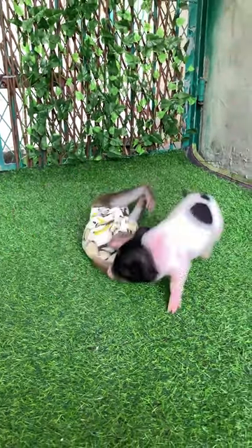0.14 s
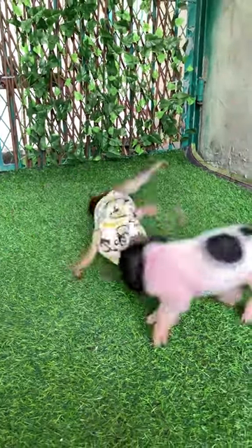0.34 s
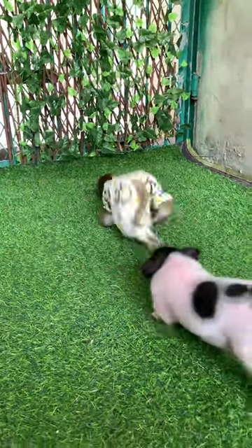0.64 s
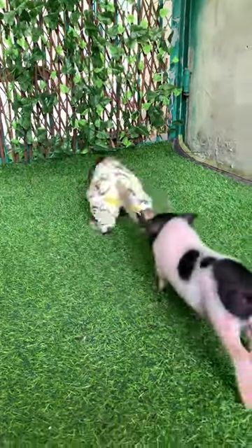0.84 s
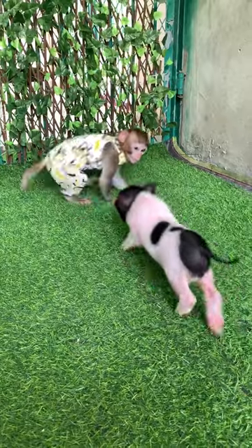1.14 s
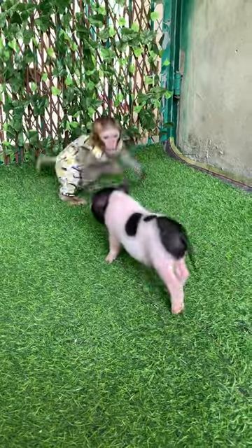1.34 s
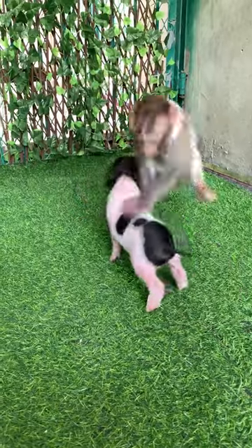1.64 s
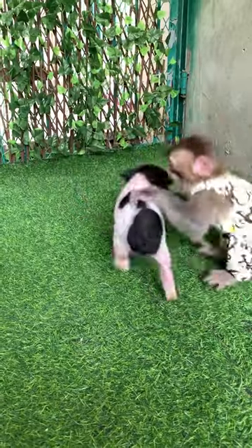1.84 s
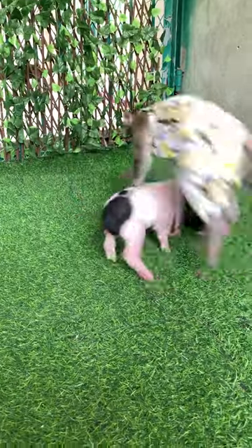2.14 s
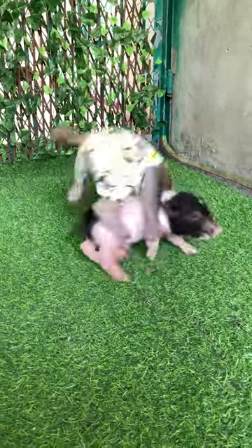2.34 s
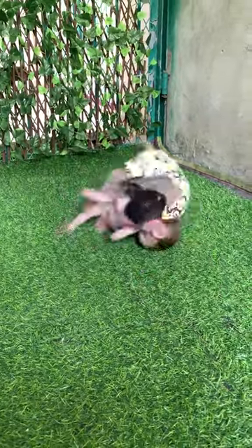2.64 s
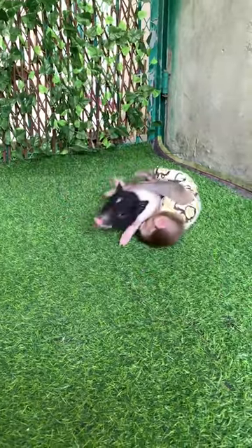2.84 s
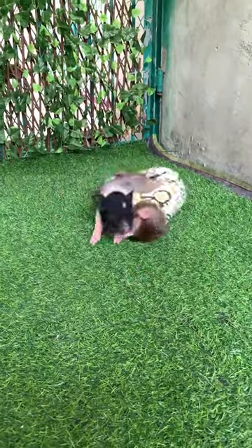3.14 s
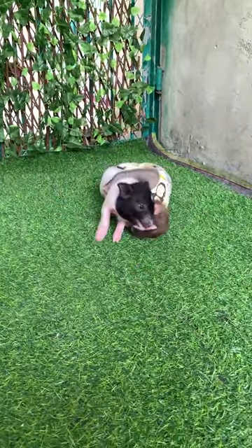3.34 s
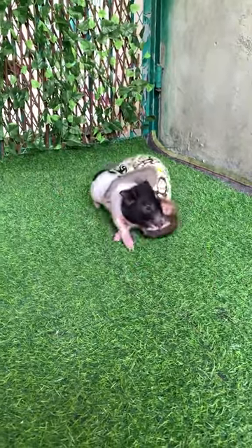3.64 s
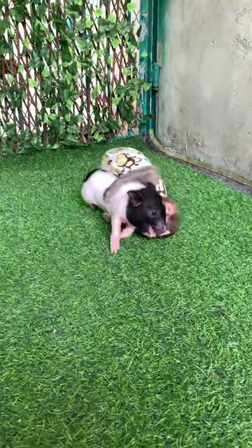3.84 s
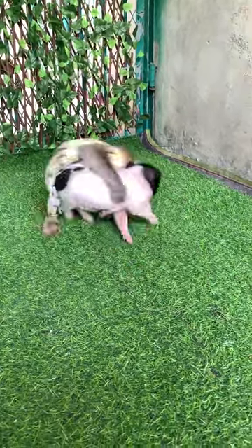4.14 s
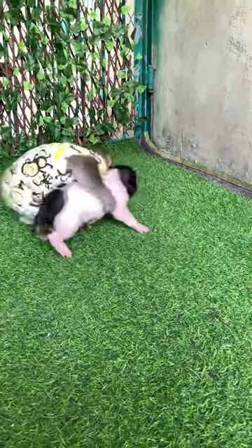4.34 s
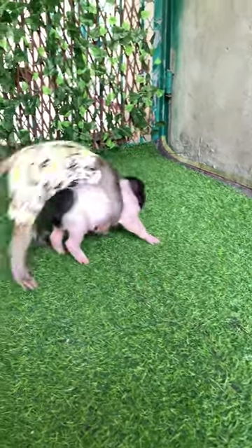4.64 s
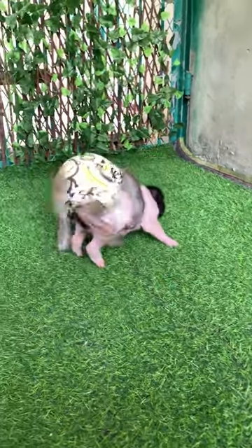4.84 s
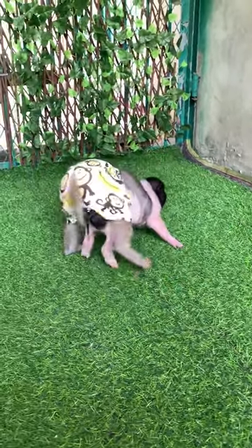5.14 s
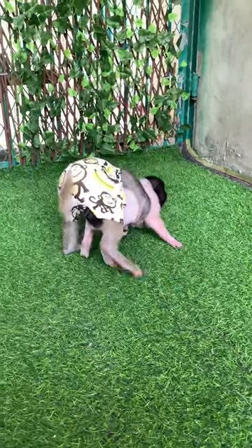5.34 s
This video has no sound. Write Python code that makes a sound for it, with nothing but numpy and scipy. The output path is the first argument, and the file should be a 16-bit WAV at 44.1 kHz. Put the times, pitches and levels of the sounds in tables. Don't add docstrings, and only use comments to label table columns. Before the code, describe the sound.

Quick paw slaps, rustling rubs and heavy soft thuds as a little monkey and piglet wrestle outdoors, with tiny squeaks and faint far traffic.

```python
import sys
import numpy as np
from scipy import signal
from scipy.fft import rfft, irfft, next_fast_len
from scipy.io import wavfile
from scipy.ndimage import uniform_filter1d

SR = 44100
rng = np.random.default_rng(int(sys.argv[2]) if len(sys.argv) > 2 else 0)


def store_pcm(level_fs):
    pcm = np.round(np.clip(level_fs, -1, 1) * 32767).astype(np.int16)
    wavfile.write(sys.argv[1], SR, np.atleast_2d(pcm).T)


def ratio(d):
    e = np.asarray(d, float) / 20
    return 10 ** e


N = 241294

# start_s, scuff_db, ground_shaking_db
LANDINGS = [(.03, -37.5, -36), (.16, -34.5, -43), (.29, -48.5, -48), (0.37, -30.5, -28), (.5, -38.5, -42),
            (.62, -39, -28), (.78, -35.5, -45), (1.18, -69, -37), (1.4, -36, -31.5), (1.66, -45, -32.5),
            (1.943, -25.5, -20), (2.06, -57.5, -49), (2.215, -30.5, -27), (2.3, -45, -32.5),
            (2.534, -27, -25), (2.61, -44.5, -23.5), (2.78, -25, -46), (2.92, -31.5, -27.5),
            (3.07, -25, -45), (3.209, -27, -35.5), (3.39, -35.5, -47.5), (3.601, -35.5, -43),
            (4.269, -38, -29.5), (4.33, -26.5, -28), (4.48, -36, -39), (4.58, -56, -36), (4.719, -55, -31),
            (4.87, -54, -38), (4.981, -36.5, -24.5), (5.13, -59, -43)]
LANDING_ATTACK_S = 0.014
# frequency_hz, density_db
BLADE_COLOUR = [(4000, -20), (5500, 4), (7000, 1), (8500, 2), (10500, -4), (13000, -1), (15800, -5.5),
                (16100, -66)]


def shape(x, points):
    size = next_fast_len(N)
    hz, db = np.transpose(points)
    bins_hz = np.arange(size // 2 + 1) * SR / size
    gain = ratio(np.interp(np.log(bins_hz + 1), np.log(hz), db))
    y = irfft(rfft(x, size) * gain, size)[..., :N]
    return y / np.std(y, axis=-1, keepdims=True)


def curves(table):
    s, *columns = np.transpose(table)
    return [np.interp(np.arange(N) / SR, s, c) for c in columns]


def walk(rate_hz):
    held = int(SR / rate_hz)
    levels = np.repeat(rng.standard_normal(N // held + 1), held)
    return uniform_filter1d(levels, held)[:N]


def swell(rows, attack_s, fall_db_s, rest_db):
    t = np.arange(N) / SR
    power = ratio(rest_db) ** 2 * np.ones(N)
    for s, hold, db in rows:
        rise_db = 30 * np.clip(s - t, 0, 1) / attack_s
        fall_db = fall_db_s * np.clip(t - s - hold, 0, 2)
        power = power + ratio(db - rise_db - fall_db) ** 2
    return 10 * np.log10(power)


def add(out, s, burst):
    i = int(s * SR)
    out[i:i + len(burst)] += burst[:N - i]


def twice(kind):
    return np.array([kind(), kind()])


def blows(table, push_s, noisy, wide, order=1):
    out = np.zeros(N)
    t = np.arange(6000) / SR
    for s, db, hz, t60 in table:
        fade = (1 - np.exp(-t / push_s)) * 0.00036 ** (t / max(t60, 0.005))
        band = signal.butter(order, [hz / wide, min(hz * wide, 0.45 * SR)], "band", fs=SR)
        scrape = signal.lfilter(*band, rng.standard_normal(len(t)))
        ring = np.sin(2 * np.pi * hz * t) + noisy * scrape / np.std(scrape)
        add(out, s, ratio(db) * fade / fade.max() * ring / (1 + noisy))
    return out


def thuds():
    # start_s, peak_db, ring_hz, t60_s
    falls = [(0.374, -25.5, 143, 0.13), (1.858, -27, 80, 0.078), (1.96, -13.5, 141, 0.06),
             (2.218, -11, 160.3, 0.12), (2.254, -18.5, 188, 0.051), (2.532, -21, 157, 0.2),
             (2.606, -13.5, 139.5, 0.12), (2.631, -7.5, 105, 0.078), (2.654, -10.5, 82.5, 0.088),
             (2.72, -16, 69.6, 0.16), (2.926, -24, 163.3, 0.066), (2.958, -16, 83, 0.055),
             (3.23, -27, 107, 0.114), (4.269, -26, 184, 0.17), (4.334, -20, 121.6, 0.11),
             (4.48, -23.5, 151, 0.11), (4.979, -11.5, 133.6, 0.084)]
    return blows(falls, push_s=0.003, noisy=0.094, wide=1.003)


def slaps():
    # start_s, peak_db, hollow_hz, t60_s
    claps = [(0.0466, -41, 2760, 0.036), (0.1509, -35, 1310, 0.19), (0.2534, -30, 1950, 0.038),
             (0.2935, -23.5, 1190, 0.028), (0.3354, -28.5, 1610, 0.06), (0.4449, -29.5, 2050, 0.082),
             (0.5125, -15.5, 2380, 0.024), (0.5417, -24, 2020, 0.052), (.586, -23, 1540, .03),
             (0.596, -20, 1190, 0.035), (0.629, -21.5, 2500, 0.038), (0.6533, -12.5, 1380, 0.031),
             (0.709, -26.5, 1486, 0.17), (.9813, -38, 1980, 0.031), (1.1629, -38, 1110, 0.046),
             (1.2946, -39, 2000, 0.057), (1.6714, -36, 2120, 0.036), (1.9397, -5, 1450, 0.023),
             (2.2317, -33.5, 1810, 0.13), (1.71, -54, 2180, 0.071), (2.443, -33, 1570, 0.046),
             (2.55, -30, 1920, .04), (2.6196, -24, 2000, 0.035), (2.657, -18.5, 1730, .035),
             (2.965, -29.5, 1480, 0.15), (2.99, -36, 1620, 0.095), (2.784, -23, 1930, 0.052),
             (3.2, -41, 1310, .1), (2.7118, -25, 1685, 0.45), (2.777, -25, 1450, 0.031),
             (2.782, -16, 4310, 0.056), (2.938, -25.5, 1910, 0.097), (3.79, -26.5, 2290, 0.015),
             (3.913, -35, 1210, 0.1), (3.939, -23, 1630, 0.013), (3.999, -22.5, 1390, 0.029),
             (4.2046, -23.5, 2460, 0.011), (4.4754, -29, 2300, 0.03), (4.7178, -26, 1460, 0.035),
             (4.9849, -29, 1020, 0.058), (5.15, -35, 2570, 0.099), (5.19, -46, 1500, 0.07),
             (5.26, -47, 2240, 0.066)]
    return blows(claps, push_s=0.00016, noisy=0.93, wide=1.96)


def smacks():
    # start_s, peak_db, ring_hz, t60_s
    clicks = [(0.0094, -34, 6980, 0.023), (0.0216, -19, 6400, 0.034), (0.0446, -19, 5940, 0.021),
              (0.046, -30.5, 2470, 0.048), (0.047, -30.5, 2780, 0.045), (0.1526, -40, 7000, 0.033),
              (0.258, -36, 7340, 0.035), (0.2947, -26, 6920, 0.037), (0.444, -24, 6660, 0.031),
              (0.5122, -24.5, 7160, 0.031), (0.6305, -25, 7900, 0.03), (0.6546, -21.5, 6296, 0.053),
              (1.295, -38.5, 6560, 0.033), (1.543, -34, 4060, 0.071), (1.566, -34, 3730, 0.11),
              (1.592, -32.5, 3720, 0.052), (1.592, -27, 6900, 0.028), (1.6693, -28, 6900, 0.036),
              (1.788, -41, 9050, 0.025), (1.9385, -21, 3290, 0.019), (2.231, -28, 6040, 0.015),
              (2.7816, -20, 7900, 0.16), (3.0644, -37, 8870, 0.03), (3.066, -23, 4450, 0.049),
              (3.094, -22.5, 4500, .03), (3.0921, -20, 7670, 0.032), (3.103, -24, 8270, 0.044),
              (3.1163, -32, 6960, 0.1), (3.1981, -32, 7900, 0.036), (3.2167, -22, 7540, 0.0113),
              (3.2264, -31.5, 8000, 0.038), (3.913, -29, 8200, 0.0305), (4.2048, -26, 8700, 0.009),
              (4.2048, -18, 6050, 0.0088), (4.27, -28.5, 1580, 0.1), (4.284, -39, 2100, .05),
              (4.33, -32, 8120, .03), (4.342, -33, 1880, 0.029), (4.7172, -34, 6540, 0.041),
              (5.109, -42, 7470, 0.043), (5.3627, -39.5, 6300, 0.18), (5.3627, -45, 7800, .04),
              (4.182, -37, 6900, .012), (4.37, -31, 8800, .03), (2.78, -17, 4050, 0.044)]
    return blows(clicks, push_s=0.00011, noisy=1.0, wide=1.08)


def knocks():
    # start_s, peak_db, ring_hz, t60_s
    bumps = [(0.15, -27.5, 503, 0.039), (0.375, -30.5, 322, 0.076), (0.597, -31, 382.6, 0.069),
             (0.654, -26, 630, 0.051), (1.854, -23, 330, 0.051), (1.941, -21, 328, 0.042),
             (2.217, -17, 310, 0.11), (2.545, -24.5, 292, 0.058), (2.619, -29, 625, 0.068),
             (2.929, -39, 282, 0.12), (4.261, -15.5, 610, 0.024), (4.272, -25.5, 410, 0.089),
             (4.283, -22.5, 433, 0.11), (4.309, -22.5, 420, 0.036), (4.318, -28, 520, 0.11),
             (4.33, -29, 740, 0.042), (4.352, -32, 696, 0.052), (4.39, -41, 507, 0.065),
             (4.718, -33, 434, 0.035), (2.7, -56, 400, 0.077), (4.987, -32, 530, 0.069)]
    return blows(bumps, push_s=0.0014, noisy=0.86, wide=1.22, order=2)


def yelps():
    # start_s, hold_s, pitch_hz, level_db, mouth_opening_db
    tones = [(0, 0.28, 740, -44.5, -32.5), (0, 0.11, 845, -48, -35), (.93, 0.099, 1060, -47, -36),
             (1.086, 0.065, 1019, -45, -40), (1.164, .03, 1000, -47, -40), (5.345, .025, 705, -51, -40),
             (5.145, .03, 1000, -56, -40), (2.78, 0.012, 474.7, -13, -1), (2.797, 0.0077, 457.6, -21, -1),
             (2.801, 0.0042, 615, -17, -36), (2.817, 0.022, 475, -25, -21),
             (2.801, 0.044, 893.8, -29.5, -40), (2.86, 0.017, 462, -37, -2),
             (3.067, 0.0029, 595, -13.5, -38), (3.086, 0.0097, 610.2, -22, -39.5),
             (3.096, 0.0057, 614, -19, -15), (3.109, 0.0063, 600, -29, -40), (3.22, 0.0033, 687, -28, -40),
             (3.229, .006, 594, -24, -40), (3.249, .004, 554, -29, -40), (3.28, 0.0042, 688, -38, -40),
             (4.274, 0.0026, 704.4, -14, -29), (4.28, 0.008, 682, -17.5, -20),
             (4.287, 0.0026, 669, -13, -18), (4.309, 0.03, 583, -44, -5)]
    overtones = [-13, -3, -11, -18, -24, -28, -26, -14, -22]
    attack_s, fall_db_s, sag_hz_s = 0.0056, 1300, 263
    out = np.zeros(N)
    waver, tremble = walk(300), walk(150)
    breath = shape(rng.standard_normal(N), BLADE_COLOUR)
    for s, hold, hz, top_db, open_db in tones:
        first = max(int((s - 2 * attack_s) * SR), 0)
        at = slice(first, int((s + hold + 60 / fall_db_s) * SR))
        t = np.arange(N)[at] / SR - s
        db = top_db - 30 * np.clip(-t, 0, 1) / attack_s - fall_db_s * np.clip(t - hold, 0, 1)
        rough = np.clip(0.23 + 0.01 * (top_db - db), 0, 0.6)
        pitch_hz = (hz - sag_hz_s * t) * (1 + 0.262 * rough * waver[at])
        phase = 2 * np.pi * np.cumsum(pitch_hz) / SR
        voice = np.sin(phase)
        for k, overtone_db in enumerate(overtones):
            mouth_db = open_db * (1.3 if k else 0.6)
            voice = voice + ratio(overtone_db + mouth_db) * np.sin((k + 2) * phase + k)
        hiss = ratio(-18) * breath[at] * (1 + np.sin(phase))
        out[at] += ratio(db - 1.5 + 5.1 * rough * tremble[at]) * (voice + ratio(open_db) * hiss)
    return out


def cracks():
    # start_s, peak_db, t60_s
    snaps = [(0.1512, -17, 0.0106), (.2584, -12, 0.023), (0.2946, -9, 0.039), (0.3365, -16, .02),
             (0.4445, -15, 0.017), (0.512, -7, 0.0102), (0.63, -19, 0.02), (0.6534, -30, 0.01),
             (1.2406, -19, 0.021), (1.2963, -8, 0.02), (1.4477, -12, 0.017), (1.593, -26, 0.012),
             (1.6704, -10, 0.018), (1.791, -31, .02), (1.8742, -25.5, .02), (1.938, -6, 0.0132),
             (2.2308, -18, 0.0083), (2.5078, -12, .02), (2.784, -4, 0.049), (3.0939, -23.5, 0.012),
             (3.1988, -17, .02), (3.807, -16, 0.025), (3.9133, -18, 0.024), (3.9996, -31, 0.014),
             (4.2047, -5.5, 0.0067), (4.2758, -22, .02), (4.3336, -12, 0.024), (4.717, -17, 0.033),
             (4.7975, -23, .02), (4.9537, -24, .02), (5.1103, -12.5, 0.027), (5.363, -29, 0.015),
             (4.182, -22, .008), (4.37, -18, .015)]
    out = np.zeros(N)
    t = np.arange(2000) / SR
    for s, db, t60 in snaps:
        snap = 0.0011 ** (t / max(t60, 0.003)) * rng.standard_normal(len(t))
        add(out, s, ratio(db - 10.0) * snap / np.abs(snap).max())
    top = signal.ellip(8, 0.5, 60, 15900, fs=SR, output="sos")
    return signal.sosfilt(top, signal.lfilter([1, -0.85], [1], out))


def grains(spread_db, share):
    tick_db = spread_db * np.minimum(rng.exponential(size=N), 7)
    ticks = ratio(tick_db) * rng.standard_normal(N)
    return share * ticks / np.std(ticks) + rng.standard_normal(N)


def patchy(x, patchy_db):
    streak_db, hole_db = 3.5, -14
    hz, t, cells = signal.stft(x, SR, nperseg=2048, noverlap=1536)

    def blur(rows, size):
        noise = rng.standard_normal((rows, len(t)))
        return np.sqrt(size) * uniform_filter1d(noise, size)

    half_octave = (2 * np.log2(np.maximum(hz, 500) / 500)).astype(int)
    flicker = blur(half_octave.max() + 1, size=5)[half_octave]
    streaks = np.repeat(blur(len(hz) // 3 + 1, size=8), 3, axis=0)[:len(hz)]
    db = patchy_db * flicker + streak_db * streaks + hole_db * (streaks < -1.2)
    y = signal.istft(cells * ratio(db), SR, nperseg=2048, noverlap=1536)[1]
    return y[:, :N] / np.std(y)


def turf():
    # start_s, hold_s, hide_rubbing_db, blades_over_hide_db
    moves = [(0.076, 0.11, -43, 0), (0.237, .02, -39, -12), (0.252, .025, -31.5, -7),
             (0.295, 0.017, -29, -5.5), (0.334, 0.034, -29, -5), (0.382, 0.059, -33.5, -9),
             (0.446, 0.049, -28.5, -6), (0.518, 0.05, -29, -4.5), (0.586, 0.022, -30.5, -5.5),
             (0.628, 0.071, -28.5, -7.5), (0.682, 0.052, -30.5, -6.5), (0.786, 0.26, -36.5, -4),
             (1.29, 0.08, -35, -3), (1.415, 0.233, -52, 8), (1.66, 0.011, -39.5, -15),
             (1.798, 0.15, -41.5, -5), (1.935, 0.031, -20.5, -10), (2.04, 0.24, -36.5, -5.5),
             (2.224, 0.54, -35.5, -4), (2.45, 0.073, -37.5, -2), (2.543, 0.12, -23.5, -2),
             (2.608, 0.078, -23, -6), (2.727, 0.069, -26.5, -2), (2.859, 0.14, -34.5, -0.5),
             (3.08, 0.058, -41, -0.5), (3.194, 0.0357, -37, -1.5), (3.373, 0.023, -40.5, -3),
             (3.536, 0.3, -41.5, -3), (3.881, .015, -36, -23), (3.913, 0.018, -27.5, -7),
             (3.988, 0.02, -37.5, -18), (4.034, .06, -47, -2), (4.09, 0.19, -42, 2.5),
             (4.264, 0.14, -37.5, 0), (4.444, 0.18, -38.5, 0), (4.719, 0.0077, -32, -2.5),
             (4.796, 0.099, -42, 4.5), (4.859, 0.046, -34.5, -15), (4.96, 0.022, -36.5, -1.5),
             (5.087, 0.052, -40, 2)]
    # start_s, hide_db, blades_db
    rest = [
        (0, -44.5, -50.5),
        (1.0, -41, -45),
        (3.4, -44, -48),
        (5.15, -40.5, -46),
        (5.25, -45, -45),
        (5.3, -54, -64),
        (5.47, -55.5, -61),
    ]
    # frequency_hz, density_db
    hide_colour = [(450, -41), (850, -1), (1500, 0.5), (2500, 0), (4000, 0), (5500, 10), (7000, -78)]
    # frequency_hz, density_db
    feet_colour = [(150, -41), (250, 1), (400, -0.5), (700, 1), (950, -16.5), (1300, -34)]
    attack_s, hide_fall_db_s, blade_fall_db_s, scuff_fall_db_s = 0.021, 202, 157, 116
    rest_hide_db, rest_blade_db = curves(rest)
    hide_rows = [(s, hold, db) for s, hold, db, _ in moves]
    blade_rows = [(s, hold, db + over_db) for s, hold, db, over_db in moves]
    scuff_rows = [(s, 0, db) for s, db, _ in LANDINGS]
    hide_db = swell(hide_rows, attack_s, hide_fall_db_s, rest_hide_db)
    blade_db = swell(blade_rows, attack_s, blade_fall_db_s, rest_blade_db)
    feet_db = swell(scuff_rows, LANDING_ATTACK_S, scuff_fall_db_s, hide_db - 9.5)

    jerk = 0.5 * walk(35) + 0.83 * walk(90) + 0.8 * walk(260)
    rub = twice(lambda: grains(spread_db=3.0, share=0.84))
    snap = twice(lambda: grains(spread_db=3.0, share=0.84))
    hide = ratio(hide_db + jerk - 2.0) * patchy(shape(rub, hide_colour), patchy_db=1.6)
    crackle = patchy(shape(0.14 * rub + snap, BLADE_COLOUR), patchy_db=2.0)
    blades = ratio(blade_db + 1.16 * jerk - 2.0) * crackle
    feet = ratio(feet_db + 0.05 * jerk + 3.8 * walk(40) - 8.5) * shape(rub, feet_colour)
    return hide + blades + feet


def ground():
    # frequency_hz, density_db
    rumble_colour = [(15, -49), (28, 1.5), (42, 5), (65, 3.5), (88, -3.5), (115, -16), (200, -115)]
    # frequency_hz, density_db
    soil_colour = [(60, -2), (90, 6), (130, 2.5), (180, -4), (260, -5), (400, -37.5)]
    # frequency_hz, density_db
    air_colour = [(150, 2.5), (300, 10.5), (600, -6.5), (1500, -17), (4000, -58), (8000, -48.5),
                  (15800, -64), (16100, -64)]
    boom_late_s, boom_fall_db_s, soil_fall_db_s = 0.035, 66, 63.5
    shakes = [(s, 0, db) for s, _, db in LANDINGS]
    booms = [(s + boom_late_s, 0, db - 3.5) for s, _, db in LANDINGS]
    soil_db = swell(shakes, LANDING_ATTACK_S, soil_fall_db_s, rest_db=-41.5)
    traffic_db = -32 - 1.4 * walk(3.1)
    rumble_db = swell(booms, boom_late_s, boom_fall_db_s, traffic_db)
    far = ratio(rumble_db) * shape(rng.standard_normal((2, N)), rumble_colour)
    soil = ratio(soil_db - 3.0 + 1.8 * walk(13)) * shape(rng.standard_normal((2, N)), soil_colour)
    air = ratio(-51.5 + 0.5 * walk(6.6)) * shape(rng.standard_normal((2, N)), air_colour)
    return far + soil + air


def tail(t60):
    t = np.arange(8000) / SR
    h = rng.standard_normal(len(t)) * 0.004 ** (t / t60)
    return h / np.sqrt(np.sum(h ** 2))


def ports(front, sides):
    # frequency_hz, phase_turns
    port_turns = [(0, 0), (60, -.01), (150, -.05), (300, -.16), (750, -.25), (1300, -.11), (1900, -.04),
                  (2100, .05), (2600, .2), (4200, .31), (4750, .48), (5400, .515), (5850, .68), (6700, .85),
                  (7100, .985), (9000, 1.015), (9600, 1.15), (11300, 1.36), (11400, 1.64), (12900, 1.85),
                  (13400, 1.99), (17000, 2.02)]
    # frequency_hz, level_db
    side_colour = [(40, -22), (100, 2), (250, 1), (600, 0.5), (1200, 3), (3500, 2), (5000, -10.5), (6500, 0),
                   (12000, 0.5)]
    # start_s, extra_phase_rad
    bearing = [(0, 0.22), (.17, -0.1), (.3, 0.11), (.65, 0.0012), (.95, -0.0092), (1.24, 0.12), (1.4, 0.11),
               (1.6, -0.15), (2.03, 0.028), (2.1, 0.072), (2.2, -0.011), (3.0, 0.028), (4.0, -0.027),
               (5.47, -0.062)]
    same_share, leak = 0.45, 0.047
    size = next_fast_len(N)
    hz = np.arange(size // 2 + 1) * SR / size
    half = np.pi * np.interp(hz, *np.transpose(port_turns))
    front, sides = rfft([front, sides], size) * (hz < 15900)

    mid = irfft(front * np.cos(half), size)[:N]
    near_null = np.exp(-((hz - 5000) / 1500) ** 2)
    mid -= curves(bearing)[0] * irfft(front * np.sin(half) * near_null, size)[:N]

    lean = 1j + 0.1 * (half < 0) + 0.14 * (hz > 400) * (hz < 1000)
    side_hz, side_db = np.transpose(side_colour)
    side_gain = ratio(np.interp(np.log(hz + 1), np.log(side_hz), side_db))
    mixed = same_share * lean * front + np.sqrt(1 - same_share ** 2) * sides
    side = irfft(side_gain * np.sin(half) * mixed, size)[:N]

    filling = sides * np.abs(np.sin(half)) * (1 + 1.24 * (hz > 9000))
    mid += leak * ratio(3.1 * walk(14)) * irfft(filling, size)[:N]
    side += 0.11 * leak * ratio(2.5 * walk(12)) * irfft(sides * (hz > 1500), size)[:N]
    return np.array([mid + side, mid - side])


def scene():
    hits = thuds() + slaps() + smacks() + knocks() + yelps()
    scattered = ratio(-2.5) * signal.fftconvolve(hits, tail(t60=0.025))[:N]
    direct = np.array([hits, scattered])
    yard = twice(lambda: signal.lfilter([0.3], [1, -0.7], signal.fftconvolve(hits, tail(t60=0.09))[:N]))
    front, sides = direct + ratio(-6.5) * yard + turf() + ground()
    return ports(front, sides) + twice(cracks)


def low_pass(x):
    return signal.sosfilt(signal.butter(12, 16850, fs=SR, output="sos"), x)


def record(dry):
    return low_pass(dry)


dry = scene()
out = record(dry)
store_pcm(out)
```